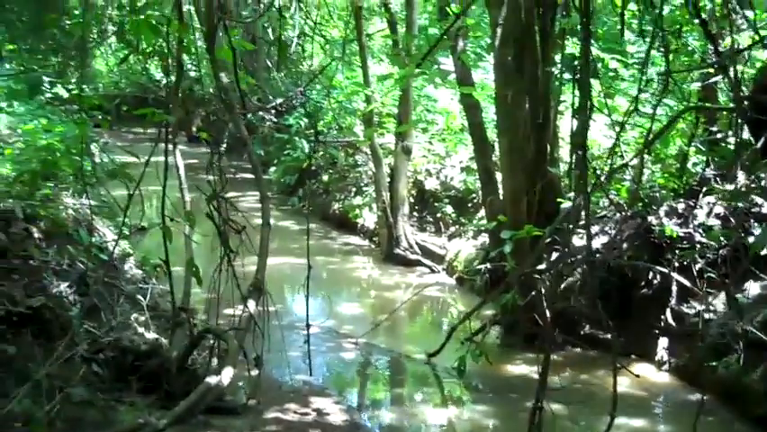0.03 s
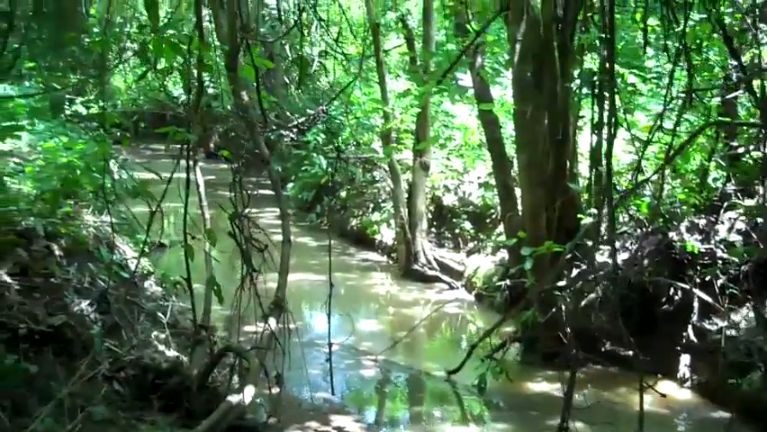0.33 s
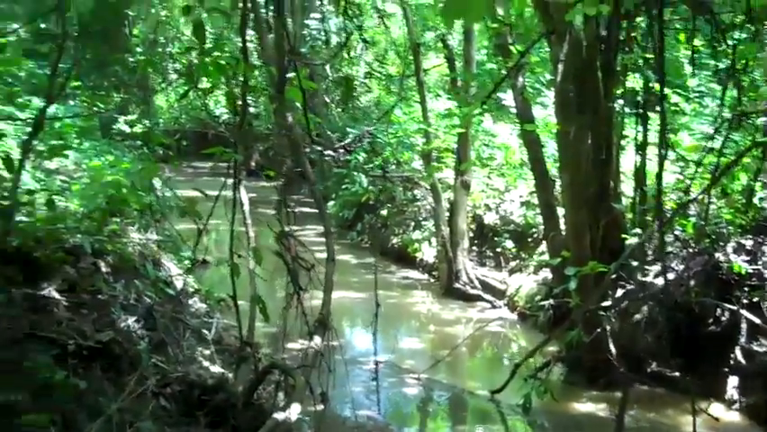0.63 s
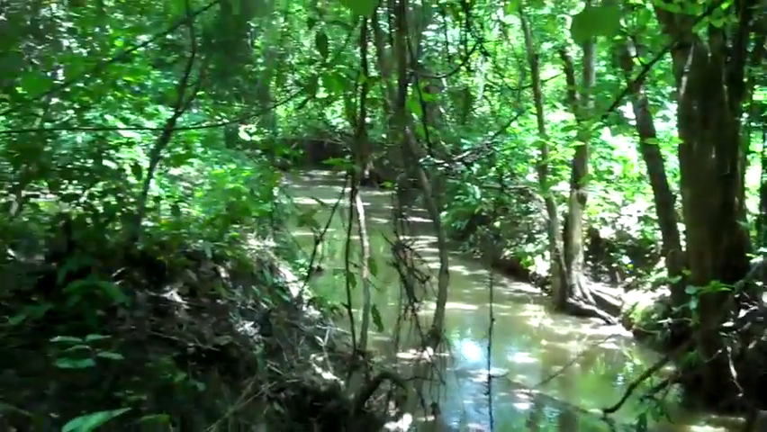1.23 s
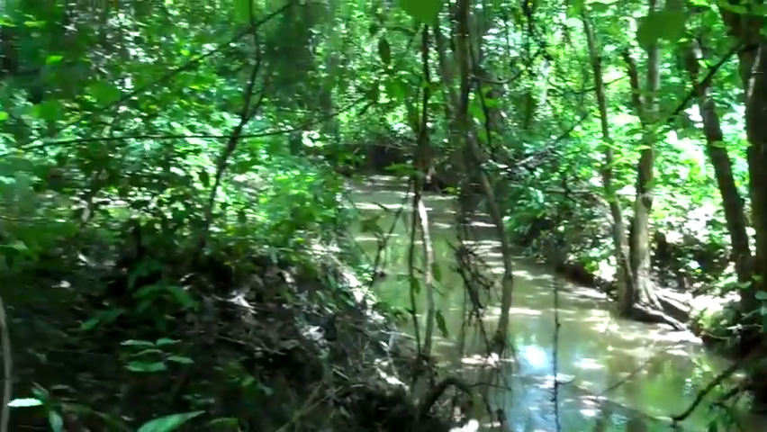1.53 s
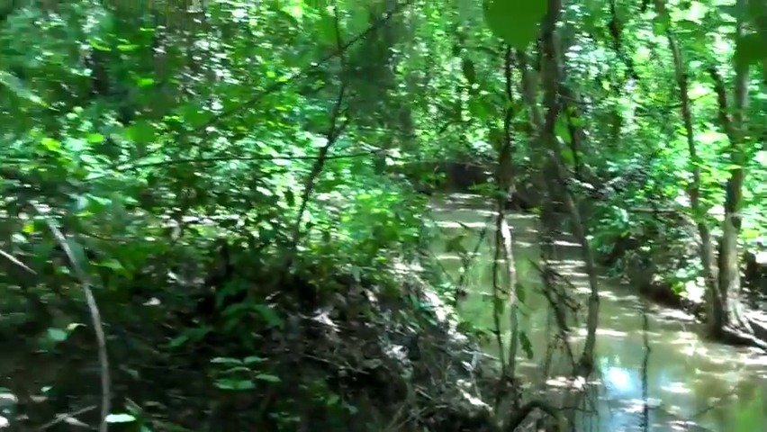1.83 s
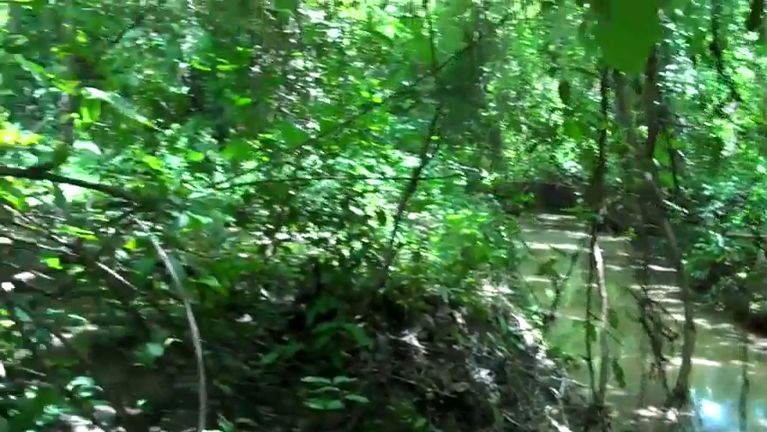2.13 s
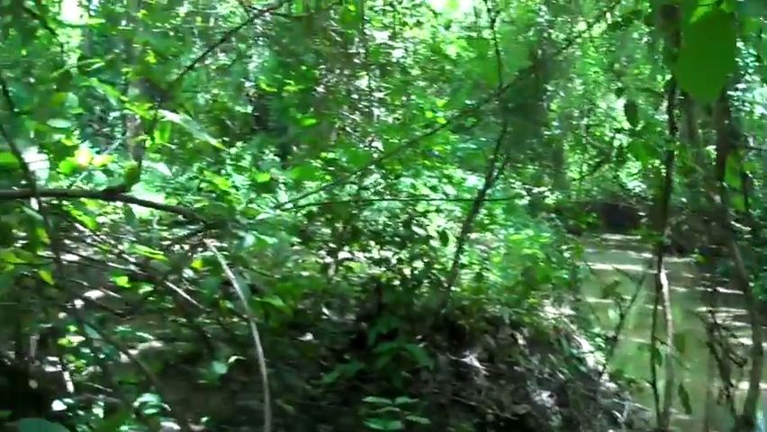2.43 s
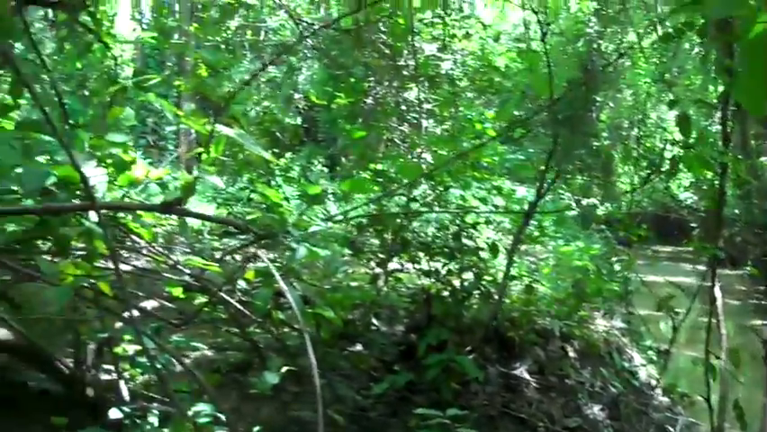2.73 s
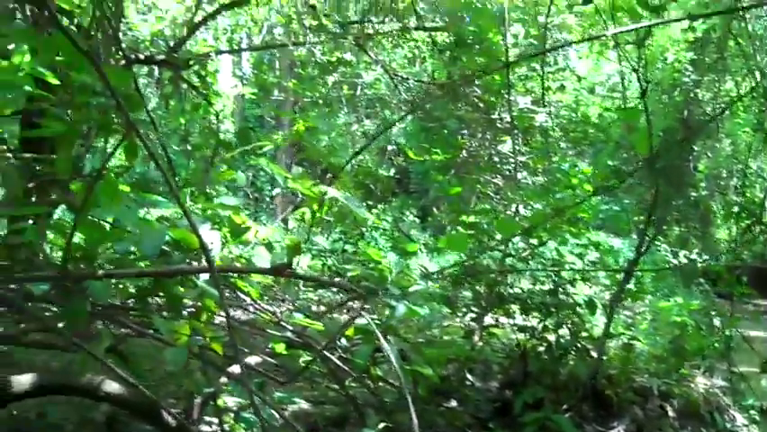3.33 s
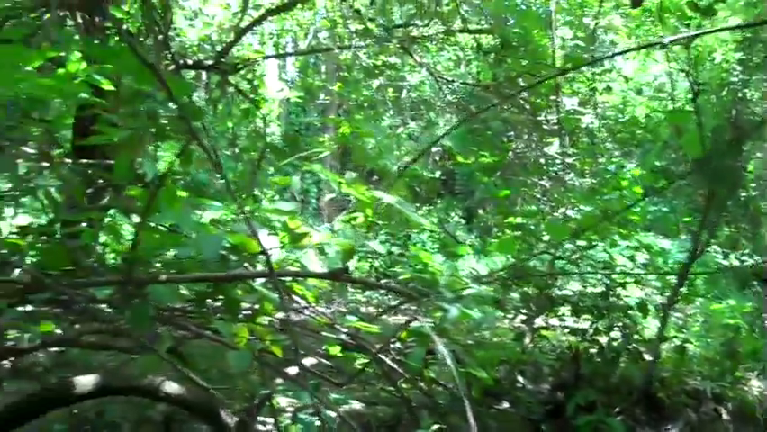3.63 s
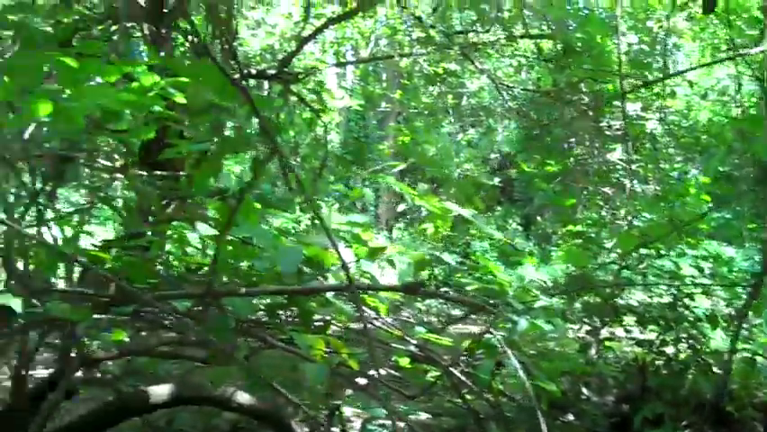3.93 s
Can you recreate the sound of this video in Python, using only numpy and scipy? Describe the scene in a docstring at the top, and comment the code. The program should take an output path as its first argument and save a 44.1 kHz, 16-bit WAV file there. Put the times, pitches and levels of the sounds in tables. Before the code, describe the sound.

A bird repeats a sharp chirp in a forest while other birds call over faint water.

```python
"""A bird repeats a sharp 'chup' twice a second in a forest beside a slow stream.
Another rasps in pairs, a third whistles, and thin notes come from far off. Each call is a gliding
tone, scattered by trunks and leaves. Twigs tick close by with a knock and a snap, over soft noise
from water and foliage and a fading insect hiss. All is heard through a pair of small microphones."""
import sys
import numpy as np
from scipy import signal
from scipy.fft import rfft, irfft
from scipy.io import wavfile
from scipy.ndimage import uniform_filter1d

SR = 44100
rng = np.random.default_rng(int(sys.argv[2]) if len(sys.argv) > 2 else 0)


def put_to_file(sound):
    """Save the sound as 16-bit audio at rate SR, in the file named by the first command-line argument."""
    columns = np.atleast_2d(sound).T  # one column per channel
    safe = np.clip(columns, -1, 1)
    whole_steps = np.round(safe * 32767)
    wavfile.write(sys.argv[1], SR, whole_steps.astype(np.int16))


N = 176400
TIME = np.arange(N) / SR


def chups(base_hz=2709, length_s=0.042, ring_hz=2560):
    """A bird's voice climbs, flicks over its top and sweeps down; the top lingers in the trees."""
    # each chup: t/s, level/dB, brightness/(dB per octave)
    calls = [(1.409, -40.5, 7), (1.899, -39.5, 3), (2.424, -40.5, 3), (2.942, -42.5, 4),
             (3.454, -42.5, 3.5), (3.979, -41, 6)]
    # course of one chup: share of its length, share of base_hz, level/dB
    shape = [(0, .53, -7), (0.272, .6, 7), (0.442, .76, 0.5), (0.582, 0.97, 4), (.74, .88, 6),
             (0.868, .68, 8), (1, .48, 9.5)]
    # how the throat boosts or weakens each frequency: f/Hz, level/dB
    throat = [(1200, -8), (1700, -3.5), (2500, 12), (3300, 0.5), (4400, 0), (5100, -13.5), (7000, -15.5),
              (9000, -35), (13000, -50)]
    out = np.zeros(N)
    at, share, shape_db = np.transpose(shape)
    for start, db, bright_db in calls:
        u = progress(length_s)
        hz = base_hz * np.interp(u, at, share) * (1 + 0.025 * waver(len(u), 760))
        voice = np.zeros(len(u))
        for k in range(1, 6):  # harmonics: whole multiples of the pitch
            harmonic_db = read(throat, k * hz) + bright_db * np.log2(k * hz / base_hz)
            voice += amp(harmonic_db) * np.sin(k * phase(hz))
        voice *= amp(np.interp(u, at, shape_db))
        add(out, start, amp(db) * unit(fade(voice, 0.1)))
    top = signal.lfilter(*signal.iirpeak(ring_hz, 10, SR), out)
    call = forest(out, direct_db=0, near_db=-2, near_s=0.085, far_db=-6, likeness=0.58)
    return call + forest(top, direct_db=-47, near_db=-8, near_s=0.67, far_db=-38, likeness=0.45)


def rasps(chirps_per_s=99, sweep=0.178, jitter=0.07):
    """A bird strings rough, falling chirps together so fast that they buzz."""
    # each rasp: t/s, length/s, level/dB, f/Hz
    calls = [(0.606, 0.045, -47.5, 3140), (0.669, 0.039, -44.5, 3060), (2.108, 0.027, -42.5, 2997),
             (2.159, 0.021, -35.5, 3000), (2.61, 0.0345, -41, 2857), (2.682, 0.019, -35, 2977),
             (3.807, 0.0099, -43.5, 3350)]
    # tones in the voice: multiple of the pitch, level/dB
    tones = [(1.003, -3), (2, 11), (2.596, 0.5)]
    out = np.zeros(N)
    for start, length, db, pitch_hz in calls:
        u = progress(length)
        cycle = (u * length * chirps_per_s) % 1  # 0 to 1 within each chirp
        hz = pitch_hz * (1 + sweep * (0.33 - cycle))
        pulses = np.minimum(cycle / 0.28, 1) * np.exp(-(cycle / 0.96) ** 2) + 0.22
        voice = np.zeros(len(u))
        for multiple, tone_db in tones:
            rough_hz = hz * (1 + jitter * waver(len(u), 2870))
            voice += amp(tone_db) * np.sin(multiple * phase(rough_hz))
        add(out, start, amp(db) * unit(fade(voice * pulses, 0.1)))
    return forest(out, direct_db=-4.5, near_db=-4.5, near_s=0.22, far_db=-0.92, likeness=0.28)


def whistles(echo_s=0.078, echo_db=-16):
    """Nearer birds sing clean, bending whistles, which echo once, and quick slides."""
    # one list of points for each whistle: t/s, f/Hz, level/dB
    curves = [
        [(1.152, 2330, -61), (1.18, 2577, -38), (1.197, 2320, -54)],
        [(1.224, 2194, -44), (1.246, 2207, -43.5), (1.288, 1870, -51.5)],
        [(3.15, 2776, -54), (3.182, 2982, -34.5), (3.2, 2415, -41.5), (3.228, 2270, -47), (3.25, 2286, -40.5),
         (3.285, 2217, -40)],
    ]
    # quick slides: t/s, length/s, first f/Hz, last f/Hz, level/dB
    slide_notes = [(1.033, .014, 2980, 2040, -49.5), (1.821, 0.0084, 6170, 4170, -45.5),
                   (2.401, 0.015, 3490, 7600, -42), (2.44, 0.0081, 7740, 5520, -36.5),
                   (3.806, 0.0092, 6840, 6560, -43.5)]
    bends, slides = np.zeros((2, N))
    for curve in curves:
        times, hz, db = np.transpose(curve)
        t = np.arange(times[0], times[-1], 1 / SR)
        pitch = np.interp(t, times, hz) * (1 + 0.005 * waver(len(t), 200))
        tone = np.sqrt(2) * np.sin(phase(pitch))
        add(bends, times[0], amp(np.interp(t, times, db)) * fade(tone, 0.06))
    for start, length, from_hz, to_hz, db in slide_notes:
        pitch = from_hz + (to_hz - from_hz) * progress(length)
        add(slides, start, amp(db) * unit(fade(np.sin(phase(pitch)), 0.5)))
    add(bends, echo_s, amp(echo_db) * bends)
    return (forest(bends, direct_db=-2.6, near_db=-6.5, near_s=0.13, far_db=-11, likeness=0.79)
            + forest(slides, direct_db=-8, near_db=-4, near_s=0.14, far_db=-4.5, likeness=0.4))


def twigs(knock_db=-12, snap_db=-13, knock_s=0.00027, snap_s=0.0016, grains_per_s=7000):
    """Twigs tick with a short, dead knock plus a noisy snap; dry leaves crunch in tiny clicks."""
    # each tick: t/s, base level/dB, extra snap level/dB, knock f/Hz
    ticks = [(0.566, -56, 14, 1500), (1.511, -47.5, 1, 1240), (2.529, -41.5, 1, 1440),
             (2.74, -41.5, -10, 970), (2.75, -52, -9, 895), (2.761, -51, 4.5, 960),
             (3.280, -39.5, -0.5, 1210), (3.494, -42, 9.5, 1070), (3.628, -46, -10, 1040)]
    # tone colour of a snap: f/Hz, level/dB
    snap_colour = [(400, -24), (1500, 10), (6500, 7), (14000, -11.5)]
    # each leaf crunch: t/s, length/s, level/dB
    crunches = [(0.323, 0.065, -57), (3.574, 0.029, -54.5), (3.613, 0.034, -51)]
    # tone colour of a crunch: f/Hz, level/dB
    crunch_colour = [(500, -11.5), (5000, 13.5), (10000, -21)]
    knocks, snaps, leaves = np.zeros((3, N))
    t = np.arange(SR // 50) / SR
    for start, db, treble_db, knock_hz in ticks:
        knock = t * np.exp(-t / knock_s) * np.sin(2 * np.pi * knock_hz * t)
        snap = rng.standard_normal(len(t)) * np.exp(-t / snap_s)
        add(knocks, start, amp(db + knock_db) * unit(knock))
        add(snaps, start, amp(db + treble_db + snap_db) * unit(snap))
    for start, length, db in crunches:
        u = progress(length)
        add(leaves, start, amp(db) * unit(clicks(len(u), grains_per_s) * np.sin(np.pi * u)))
    out = knocks + colour(snaps, snap_colour) + colour(leaves, crunch_colour)
    return forest(out, direct_db=0, near_db=-7.5, near_s=0.058, far_db=-1.5, likeness=1)


def mews(hoarse=0.012, flutter_db=6):
    """A bird's hoarse, nasal notes rise and level off, fluttering in strength."""
    # each note: t/s, length/s, first f/Hz, last f/Hz, level/dB
    notes = [(0.108, 0.045, 1263, 1480, -60.5), (0.506, 0.09, 1130, 1514, -54.5),
             (1.823, 0.07, 1087, 1510, -53)]
    # harmonics, lowest first: level/dB
    harmonics = [0, -3, -16, -13]
    out = np.zeros(N)
    for start, length, from_hz, to_hz, db in notes:
        u = progress(length)
        hz = from_hz + (to_hz - from_hz) * np.sin(u * np.pi / 2)
        hz *= 1 + hoarse * waver(len(u), 600)
        voice = sum(amp(level + flutter_db * waver(len(u), 110)) * np.sin(k * phase(hz))
                    for k, level in enumerate(harmonics, 1))
        add(out, start, amp(db) * unit(fade(voice, 0.4)))
    return forest(out, direct_db=-0.7, near_db=-1, near_s=0.14, far_db=-6.5, likeness=1)


def far_birds(wobble=0.011, hoarse=0.032):
    """Far birds sing thin notes and hoarse twitters that mostly arrive by bouncing off trees."""
    # thin notes: t/s, length/s, first f/Hz, last f/Hz, level/dB
    thin_notes = [(0, 0.031, 6540, 6456, -50), (1.049, 0.041, 2236, 2320, -52),
                  (1.296, 0.16, 6970, 6710, -58), (2.47, 0.055, 6790, 6490, -50.5),
                  (3.037, 0.07, 6800, 6770, -54), (3.05, 0.023, 2470, 1944, -46)]
    # hoarse twitters: t/s, length/s, first f/Hz, last f/Hz, level/dB
    twitters = [(.12, 0.062, 5250, 5260, -55), (.32, 0.13, 4157, 4590, -56.5),
                (.35, .08, 6300, 5960, -52.5), (3.785, .2, 5270, 4830, -49),
                (3.89, 0.098, 3940, 3660, -49.5), (3.9, 0.099, 7700, 7520, -58)]
    out = np.zeros(N)
    for notes, rough in [(thin_notes, wobble), (twitters, hoarse)]:
        for start, length, from_hz, to_hz, db in notes:
            u = progress(length)
            hz = (from_hz + (to_hz - from_hz) * u) * (1 + rough * waver(len(u), 690))
            add(out, start, amp(db) * unit(fade(np.sin(phase(hz)), 0.5)))
    return forest(out, direct_db=-8, near_db=-3.5, near_s=0.11, far_db=-4.5, likeness=0.024)


def seesaw_bird(high_hz=5400, low_hz=4358, length_s=0.046):
    """A far bird switches between two thin pitches, blurred by the woods."""
    # each note: t/s, 0 for high or 1 for low, level/dB
    notes = [(.2, 0, -64), (.78, 1, -63), (.88, 0, -64), (1.04, 1, -62), (1.14, 0, -60), (1.28, 1, -62),
             (1.66, 0, -65), (2.88, 0, -60)]
    out = np.zeros(N)
    u = progress(length_s)
    for start, low, db in notes:
        hz = (low_hz if low else high_hz) * (1 + 0.007 * waver(len(u), 300))
        add(out, start, amp(db) * unit(np.sin(phase(hz)) * np.sin(np.pi * u)))
    return forest(out, direct_db=-10, near_db=-4, near_s=0.3, far_db=-2, likeness=0.4)


def stream_and_foliage(patchy_db=2):
    """Water and leaves make a soft noise in which louder patches come and go."""
    # tone colour of the noise: f/Hz, level/dB
    spectrum = [(20, -12), (700, 1.5), (2200, 1), (3700, -0.5), (5400, 3.5), (7200, 2), (10500, -13),
                (14000, -12)]
    # its loudness: t/s, level/dB
    loudness = [(0, -53.5), (4, -52.5)]
    # how alike left and right are: f/Hz, likeness (1 is identical)
    likeness = [(120, 0), (600, 0.48), (1500, 0.69), (5500, 0)]
    frames, hz = N // 256 + 5, np.fft.rfftfreq(1024, 1 / SR)
    a, b, c, d, patches = rng.standard_normal((5, frames, len(hz)))  # grids of time by frequency
    for axis in (0, 1):
        patches = uniform_filter1d(patches, size=12, axis=axis)
    same = read(likeness, hz)
    left = a + 1j * b
    right = same * left + np.sqrt(1 - same ** 2) * (c + 1j * d)
    spectra = np.array([left, right]) * amp(read(spectrum, hz) + patchy_db * unit(patches))
    noise = signal.istft(spectra.transpose(0, 2, 1), nperseg=1024, noverlap=768)[1][:, :N]
    return unit(noise) * amp(np.interp(TIME, *np.transpose(loudness)))


def insects(centre_hz=8820, width_hz=170, gain_db=-2):
    """Insects make a high hiss, a narrow band of noise that fades away."""
    # fade of the hiss: t/s, base level/dB
    loudness = [(0, -65.5), (1.8, -67), (3, -95)]
    band = np.exp(-((np.fft.rfftfreq(N, 1 / SR) - centre_hz) / width_hz) ** 2 / 2)
    hiss = irfft(rfft(rng.standard_normal((2, N))) * band, N)
    return unit(hiss) * amp(np.interp(TIME, *np.transpose(loudness)) + gain_db)


def forest(x, direct_db, near_db, near_s, far_db, likeness, far_s=0.7):
    """Sound arrives directly, then as many small echoes from nearby trunks and from deeper woods."""
    t = np.arange(SR) / SR
    out = amp(direct_db) * np.array([x, x])
    layers = [(near_db, near_s, 1500, likeness), (far_db, far_s, 5000, likeness / 2)]
    for db, decay_s, echoes_per_s, shared in layers:
        echoes = clicks((3, SR), echoes_per_s) * amp(-60 * t / decay_s) * np.minimum(t / 0.0058, 1)
        echoes /= np.linalg.norm(echoes, axis=1, keepdims=True)
        # both sides share the first set of echoes, and each has one of its own
        pair = np.sqrt(shared) * echoes[0] + np.sqrt(1 - shared) * echoes[1:]
        out += amp(db) * signal.fftconvolve(x[None], pair, axes=1)[:, :N]
    return out


def amp(db):
    """Turns decibels into a number to multiply by."""
    return 10 ** (np.asarray(db) / 20)


def unit(x):
    """Scales a signal to an average strength (rms) of one."""
    return x / np.sqrt(np.mean(x ** 2) + 1e-20)


def read(points, hz):
    """Reads between the points of a frequency table, with octaves evenly spaced."""
    f, value = np.transpose(points)
    return np.interp(np.log(hz + 1), np.log(f), value)


def colour(x, points):
    """Boosts or weakens frequencies by a table of f/Hz, level/dB."""
    hz = np.fft.rfftfreq(x.shape[-1], 1 / SR)
    return irfft(rfft(x) * amp(read(points, hz)), x.shape[-1])


def add(mix, start_s, sound):
    """Mixes a sound in at its start time."""
    part = mix[max(round(start_s * SR), 0):][:len(sound)]
    part += sound[:len(part)]


def waver(n, hz):
    """A smooth random wobble of strength about one, with rates up to about hz."""
    keep_slow = np.exp(-(np.fft.rfftfreq(SR, 1 / SR) / hz) ** 2)
    return unit(irfft(rfft(rng.standard_normal(SR)) * keep_slow))[:n]


def clicks(shape, per_s):
    """Tiny clicks of random size at random times."""
    return rng.standard_normal(shape) * (rng.random(shape) < per_s / SR)


def fade(x, share):
    """Fades a note in and out; the two fades together take this share of it."""
    return x * signal.windows.tukey(len(x), share)


def progress(length_s):
    """Runs from 0 to 1 over a note."""
    return np.linspace(0, 1, max(int(length_s * SR), 16))


def phase(hz):
    """Adds up a changing pitch into the angle of a sine wave."""
    return 2 * np.pi * np.cumsum(hz) / SR


def scene():
    """Birds and twigs sound over the stream, foliage and insects."""
    background = stream_and_foliage() + insects()
    return background + chups() + rasps() + whistles() + mews() + far_birds() + seesaw_bird() + twigs()


def record(dry, cutoff_hz=14220):
    """The two microphone openings colour the sound differently; the highest treble is cut off."""
    # left side minus right side: f/Hz, level/dB
    balance = [(30, 10), (200, 5), (700, 2), (4300, -.5), (6000, -3), (7400, 10.5), (8700, 10.5),
               (11000, 0.5)]
    tilt_db = read(balance, np.fft.rfftfreq(N, 1 / SR)) / 2
    heard = irfft(rfft(dry) * amp([tilt_db, -tilt_db]), N)
    treble_cut = signal.firwin(511, cutoff_hz, window=("kaiser", 9), fs=SR)
    return signal.oaconvolve(heard, treble_cut[None], "same")


dry = scene()
out = record(dry)
put_to_file(out)
```